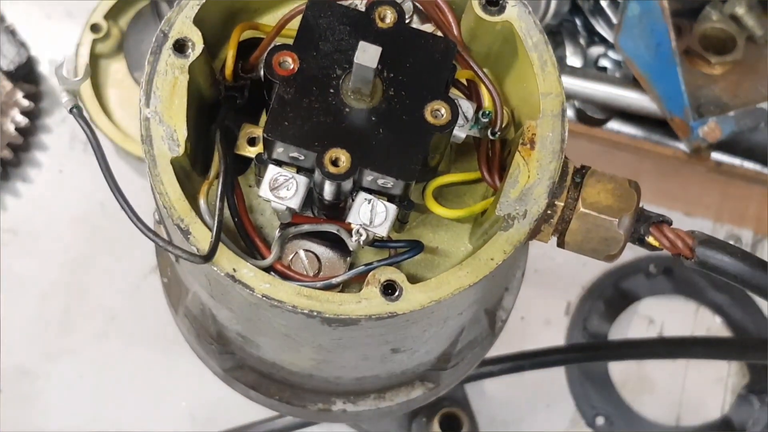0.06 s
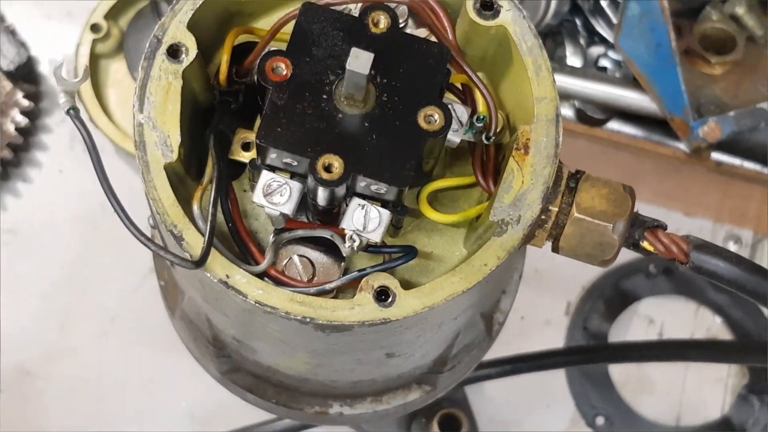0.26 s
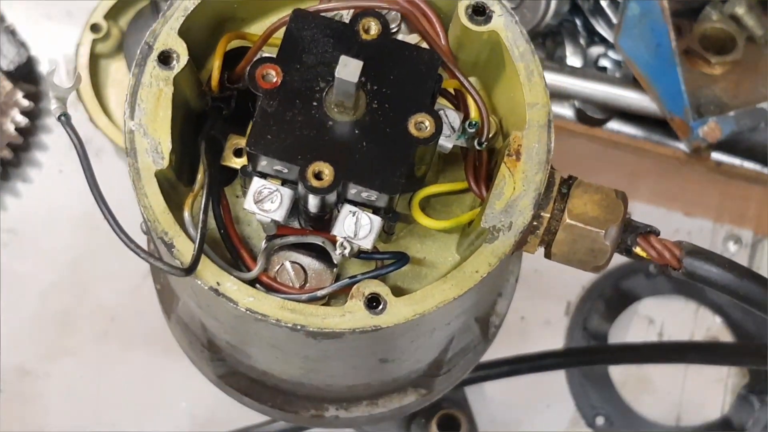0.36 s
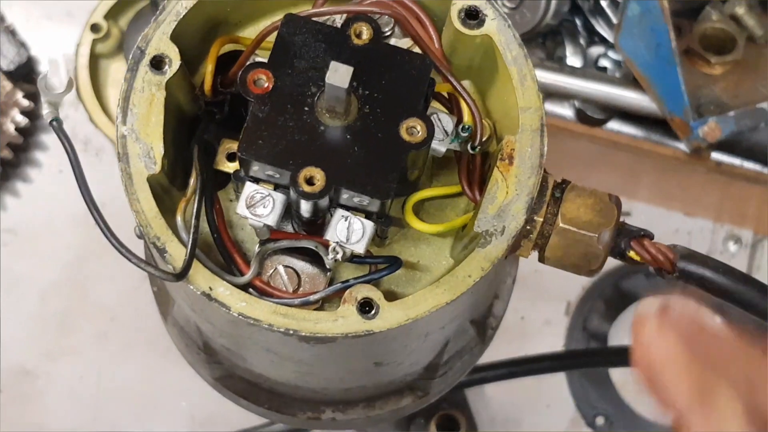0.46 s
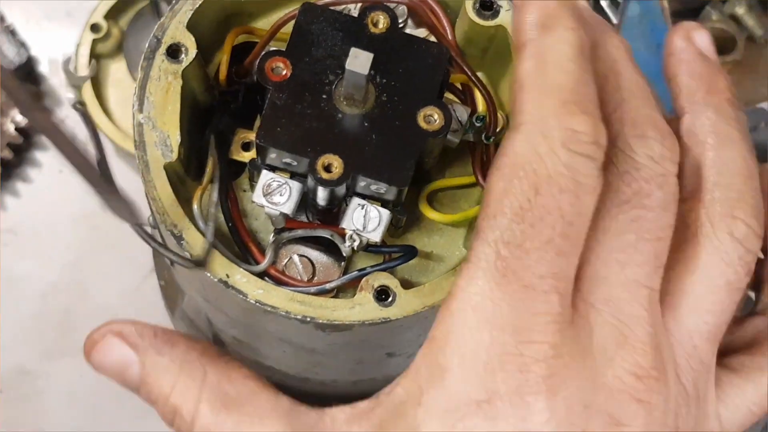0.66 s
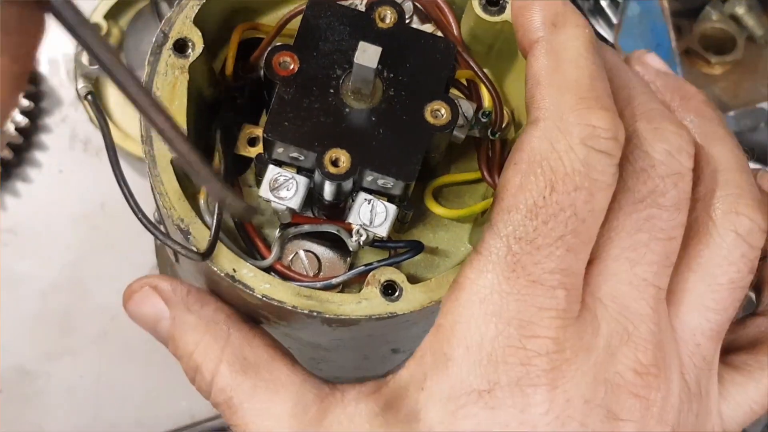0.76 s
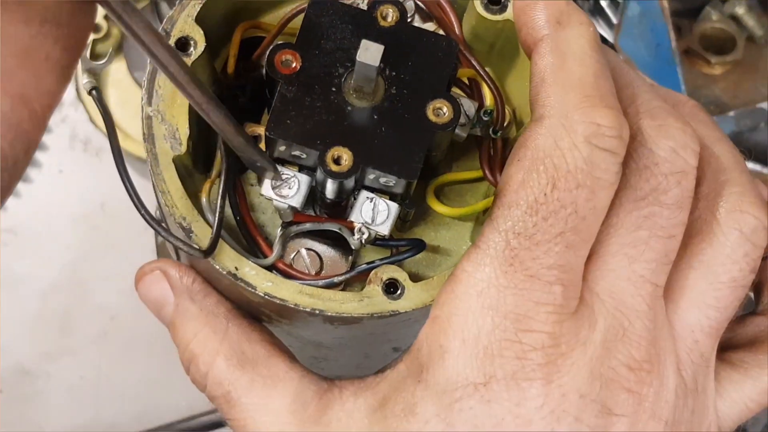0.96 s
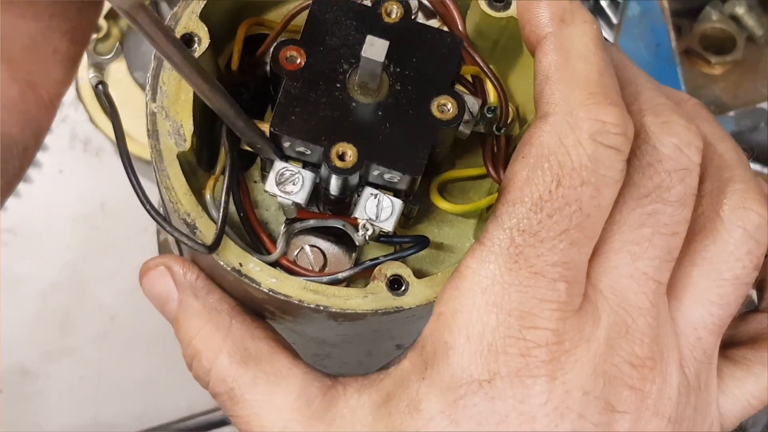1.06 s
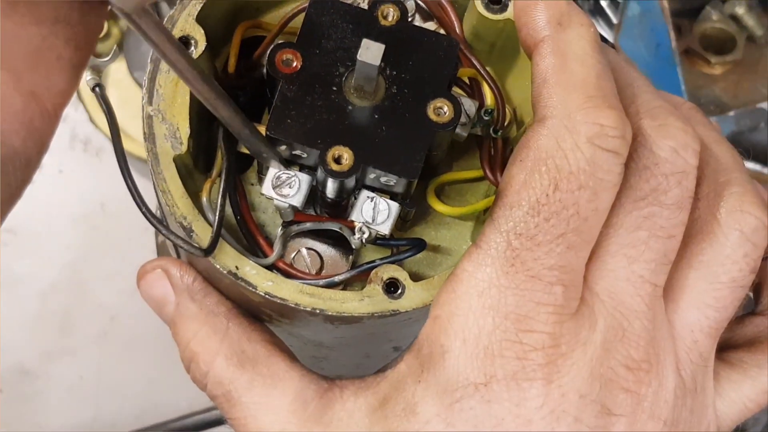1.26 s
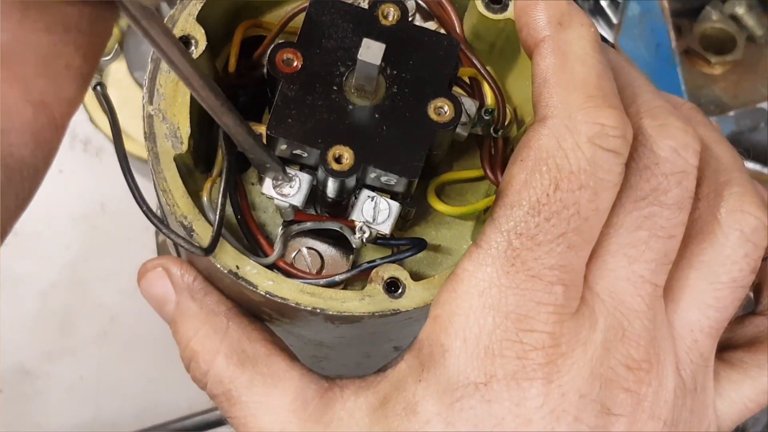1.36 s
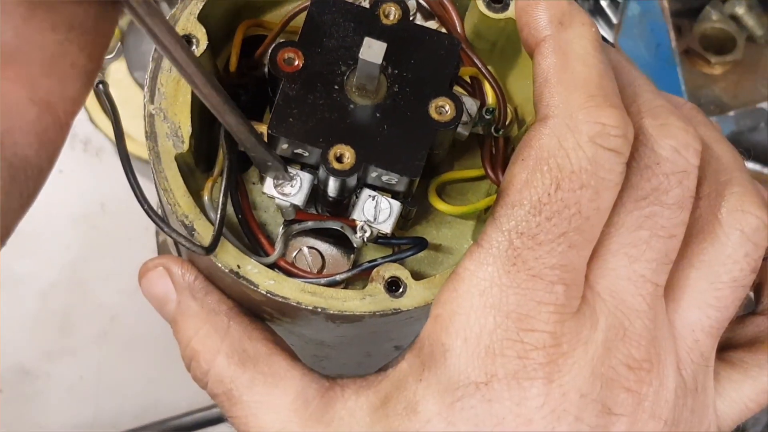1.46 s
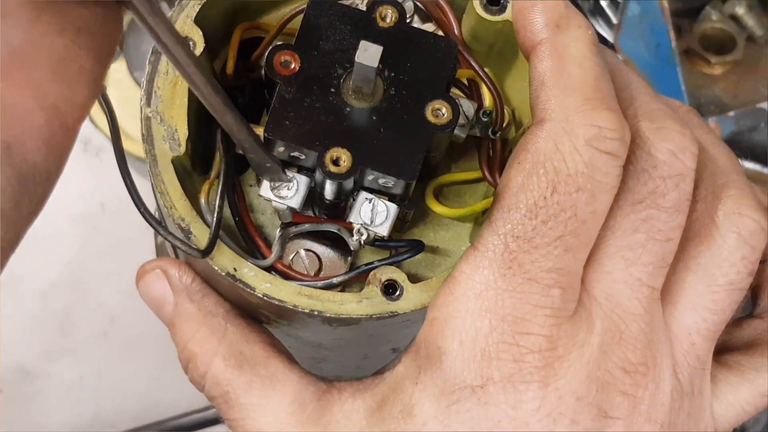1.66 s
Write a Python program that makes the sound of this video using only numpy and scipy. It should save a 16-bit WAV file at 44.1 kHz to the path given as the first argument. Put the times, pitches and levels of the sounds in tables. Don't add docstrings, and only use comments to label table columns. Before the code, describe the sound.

Screwdriver contact on metal terminal screws, recorded close in a quiet workshop. At about 0.15 s a tool lands with a hollow knock, thud and loose rattle, settling by 0.25 s. Soft sleeve rustle follows until 0.8 s, with a tiny tick near 0.75. A light tap at 1.03 precedes the hard, bright click at 1.11, then faint scrapes to 1.35 and a last tap at 1.45. Low rumble and hiss throughout.

```python
import sys
import numpy as np
from scipy import signal
from scipy.fft import rfft, irfft, next_fast_len
from scipy.io import wavfile
from scipy.ndimage import map_coordinates

SR = 44100
rng = np.random.default_rng(int(sys.argv[2]) if len(sys.argv) > 2 else 0)


def dump(signal):
    limited = np.clip(np.atleast_2d(signal).T, -1, 1)
    pcm = np.round(limited * 32767).astype(np.int16)
    wavfile.write(sys.argv[1], SR, pcm)


def nominal_scale(level):
    x = np.asarray(level, float) / 20
    return 10 ** x


N = 74970

# f/Hz, level/dB
CRACK_COLOUR = [(500, -53.5), (1200, -11.5), (2200, -3), (4000, 1.4), (7000, -13.5), (10000, -21),
                (16000, -31.5)]
# f/Hz, level/dB per Hz
BRIGHT_COLOUR = [(1000, -37.5), (5000, -1.5), (8000, -2), (11500, 3), (16000, -9)]
SCREW_T60 = .016
WANDER = .05


def unit(x):
    return x / np.sqrt(np.mean(x ** 2) + 1e-20)


def along(points, hz):
    f, v = np.transpose(points)
    return np.interp(np.log(hz + 1), np.log(f + 1), v)


def filtered(x, response):
    m = next_fast_len(x.shape[-1] + 4096)
    spectrum = rfft(x, m) * response(np.fft.rfftfreq(m, 1 / SR))
    return irfft(spectrum, m)[..., :x.shape[-1]]


def band(x, lo_hz, hi_hz):
    return signal.sosfilt(signal.butter(3, [lo_hz, hi_hz], "band", fs=SR, output="sos"), x)


def noise(points, size, alike=0.4, tilt_db=0):
    a, b = rng.standard_normal((2, size))
    u = np.arccos(np.clip(alike, -1, 1)) / 2
    pair = np.array([np.cos(u) * a + np.sin(u) * b, np.cos(u) * a - np.sin(u) * b])
    return unit(filtered(pair, lambda hz: nominal_scale(along(points, hz) + tilt_db * np.log2((hz + 50) / 3500))))


def wobble(rate):
    return map_coordinates(rng.standard_normal(int(N * rate / SR) + 4), [np.arange(N) * rate / SR])


def ring(modes, tilt_db, t60):
    t = np.arange(SR // 4) / SR
    hz, db = np.transpose(modes)[:, :, None]
    spread_db = 2 * rng.standard_normal((2, len(hz), 1))
    level = nominal_scale(db + tilt_db * np.log2(hz / 3500) + spread_db - 60 * t / t60)
    drift = WANDER * np.cumsum(rng.standard_normal((len(hz), len(t))), axis=1)
    start = .5 * rng.standard_normal((2, len(hz), 1))
    return np.sum(level * np.sin(2 * np.pi * hz * t + drift + start), axis=1)


def add(track, s, x, pan_db):
    i = round(s * SR)
    track[:, i:i + x.shape[1]] += (x * nominal_scale([[pan_db / 2], [-pan_db / 2]]))[:, :N - i]


def crack_and_chatter(t):
    return nominal_scale(-0.5 - 60 * t / 0.0057) + nominal_scale(-6 - 60 * t / 0.0426)


def screw_taps():
    # t/s, peak level/dB, brightness/dB per octave, ring share 0-1, housing note/dB over peak
    taps = [(0.3571, -55.5, -22.5, .5, -42.5), (0.8842, -49.5, 1, .3, -38), (1.028, -24.5, 1, 0.2, -19.5),
            (1.0755, -34, -13, 0.4, -12.5), (1.1128, -8, -3.9, 0.55, -56), (1.118, -14, -4, 0.8, -31),
            (1.1285, -31, 11.5, 0.3, -12), (1.145, -35.5, 15, 0, -5.5), (1.17, -56, 14, 0.2, -4),
            (1.292, -42, -7.5, .3, -28), (1.337, -51, 7.5, 0.4, -33.5), (1.4538, -29, -0.5, 0.32, -17.5)]
    # f/Hz, level/dB
    screw_modes = [(1500, -21.5), (1720, -9.5), (2132, -13), (2550, -9.5), (2760, -7), (3400, -0.5),
                   (3690, 7), (4300, -16), (5303, -7.5)]
    noisy, rings, t = np.zeros((2, N)), np.zeros((2, N)), np.arange(SR // 4) / SR
    swell = nominal_scale(-60 * t / .05) * (1 - np.exp(-t / 0.0048))
    hollow = swell * np.sin(2 * np.pi * 896 * t) * np.ones((2, 1))
    burst = crack_and_chatter(t)
    for s, db, tilt_db, share, hollow_db in taps:
        level = nominal_scale(db - 14.0)
        crack = burst * noise(CRACK_COLOUR, len(t), alike=.8, tilt_db=tilt_db)
        screw = ring(screw_modes, tilt_db, SCREW_T60)
        add(noisy, s, level * band((1.1 - share) * crack, 1400, 7000), pan_db=11.5)
        add(rings, s, level * band(share * screw, 1500, 6300), pan_db=17)
        add(rings, s, nominal_scale(db + hollow_db) * hollow, pan_db=8.5)
    return noisy, rings


def slot_scrapes():
    # t/s, half length/s, singing mode f/Hz, its share 0-1
    slides = [(1.086, .004, 2100, .5), (1.088, .003, 3650, .7), (1.1, .004, 1900, .7),
              (1.228, .008, 1850, .85), (1.308, .014, 1550, .4), (1.32, .008, 4300, .4),
              (1.328, .006, 2540, .8), (1.334, .003, 3700, .6), (1.333, .004, 4100, .5),
              (1.333, .006, 6300, .5), (1.355, .01, 5500, .1)]
    slide_db = [-44, -48, -56, -72.5, -70, -63.5, -58.5, -51, -57.5, -69, -72.5]
    slips_per_s, scatter_db = 5800, 3.5
    middle_s = .04
    noisy, rings, t = np.zeros((2, N)), np.zeros((2, N)), np.arange(SR // 4) / SR
    for (s, half, hz, share), db in zip(slides, slide_db):
        slips = (rng.random(len(t)) < slips_per_s / SR) * rng.choice([-1, 1], len(t))
        slips = slips * nominal_scale(scatter_db * rng.standard_normal(len(t)))
        slips = nominal_scale(db) * unit(slips)[None] * np.exp(-.5 * ((t - middle_s) / half) ** 2)
        sing = nominal_scale(-60 * t / .013) * np.sin(2 * np.pi * hz * t) * np.ones((2, 1))
        grit = nominal_scale(-60 * t / .003) * noise(CRACK_COLOUR, len(t))
        for track, part, body in (rings, share, sing), (noisy, 1 - share, grit):
            x = band(signal.fftconvolve(slips, body, axes=1), 1100, 8000)
            x = x * np.linalg.norm(slips) / np.linalg.norm(x[0])
            add(track, s - middle_s, part * x, pan_db=13)
    return noisy, rings


def plate_touches():
    # t/s, level/dB, brightness/dB per octave
    nudges = [
        (1.028, -39.5, 3),
        (1.4535, -48.5, -2),
    ]
    # f/Hz, level/dB
    plate_modes = [(1270, -11), (1530, -5), (1800, -3.5), (2130, -2), (2520, -3.5), (3220, -5),
                   (3600, -1.5), (4160, 0), (4500, -4.5), (4760, -7.5), (5230, -6.5), (5950, -8),
                   (7000, -17)]
    # t/s, level/dB
    ticks = [
        (1.028, -50),
        (1.4538, -56),
    ]
    # f/Hz, level/dB
    blade_modes = [(1800, -0.5), (3550, -0.7), (5200, -3), (6500, -1), (7800, -24), (11500, -9)]
    out, t = np.zeros((2, N)), np.arange(SR // 4) / SR
    for s, db, tilt_db in nudges:
        add(out, s, nominal_scale(db) * band(ring(plate_modes, tilt_db, SCREW_T60), 1100, 8900), pan_db=11)
    for s, db in ticks:
        add(out, s, nominal_scale(db - 60 * t / .006) * noise(BRIGHT_COLOUR, len(t)), pan_db=8.5)
    blade = ring(blade_modes, 0, SCREW_T60) + 0.56 * crack_and_chatter(t) * noise(BRIGHT_COLOUR, len(t))
    add(out, .7495, nominal_scale(-51.5) * band(blade, 1600, 13000), pan_db=17.5)
    return out


def tool_landing():
    # t/s, peak level/dB, rattle length/s, rattle over ring/dB
    knocks = [
        (0.1036, -39.5, 0.002, -3),
        (0.107, -31.5, 0.013, -2),
        (0.1436, -20, 0.0012, -7.5),
        (0.1449, -10.5, 0.0011, -14.5),
        (0.153, -20.5, 0.0019, -11.5),
        (0.16, -23, 0.0063, -6),
        (0.167, -21.5, 0.011, -8),
        (0.2063, -29.5, 0.002, -8.5),
        (0.216, -36, 0.0025, -8),
        (.223, -33.5, 0.0049, -9.5),
    ]
    # f/Hz, level/dB
    tool_modes = [(1195, -18), (1400, -15), (1744, -13), (2300, -18), (2826, -17), (3500, -15), (3920, -13),
                  (4800, -10.5), (5100, -15.5), (6630, -25.5)]
    # f/Hz, level/dB per Hz
    rattle_colour = [(400, -40), (620, -26.5), (950, -12.5), (1400, -14), (2100, -15), (4500, -6),
                     (6400, -20.5), (16000, -25)]
    out, t = np.zeros((2, N)), np.arange(SR // 4) / SR
    for s, db, hold, rattle_db in knocks:
        shake = np.minimum(1, nominal_scale(-60 * (t - hold) / 0.063)) * nominal_scale(1.4 * wobble(300)[:len(t)])
        dull_db = 0.58 * (db + 16.0)
        rattle = shake * noise(rattle_colour, len(t), alike=0.42, tilt_db=dull_db)
        x = ring(tool_modes, 0, .022) + nominal_scale(rattle_db) * rattle
        add(out, s, nominal_scale(db) * band(band(x, 680, 18000), 680, 18000), pan_db=6.0)
    return out


def handle_tocks():
    # t/s, peak level/dB, f/Hz, t60/s
    tocks = [(0.1034, -27.5, 1040, 0.033), (.1438, -14.5, 1022, .045), (.1438, -15.5, 875.6, .05),
             (.1438, -27, 732, .05), (.1513, -26.5, 900, .04), (0.152, -24, 1215, .04),
             (.162, -29, 1010, .03), (.172, -24, 1100, .02), (.2071, -28, 991, .022),
             (.214, -34.5, 900, .022), (.222, -33.5, 900, .035)]
    out, t = np.zeros((2, N)), np.arange(SR // 4) / SR
    for s, db, hz, t60 in tocks:
        drift = .25 * WANDER * np.cumsum(rng.standard_normal(len(t)))
        level = nominal_scale(db - 60 * t / t60) * (1 - np.exp(-t / .001))
        add(out, s, -level * np.sin(2 * np.pi * hz * t + drift) * np.ones((2, 1)), pan_db=4.0)
    return out


def bench():
    # t/s, peak level/dB, f/Hz, rise/s, t60/s
    thumps = [(.001, -51.5, 150, 0.0031, .08), (0.055, -27.5, 129.3, 0.019, 0.059),
              (0.109, -32, 209, 0.0016, 0.15), (0.1428, -24, 137, 0.0023, 0.11),
              (0.147, -27, 241.7, 0.0034, .1), (.175, -42.5, 50, 0.013, 0.17),
              (.208, -35.5, 182.5, 0.0043, 0.086), (.215, -45.5, 265, 0.0047, .1),
              (0.231, -42.5, 109, 0.004, 0.11), (0.496, -57, 447, 0.016, 0.13),
              (.585, -53, 150, 0.0061, .12), (0.706, -48, 60, 0.0077, .15), (.755, -52.5, 72.8, .005, 0.14),
              (1.029, -40.5, 148.5, 0.0026, 0.084), (1.045, -48, 55.5, .01, .12),
              (1.075, -44, 110, .004, .1), (1.115, -42, 138, 0.0044, 0.079),
              (1.145, -40.5, 154.2, 0.0011, 0.13), (1.166, -41, 85, 0.0042, 0.11),
              (1.316, -58, 71.1, 0.016, .15), (1.455, -36, 147.9, 0.0019, .07),
              (1.478, -47.5, 109.5, .003, .05), (1.505, -48, 84.4, 0.0051, 0.099)]
    out, t = np.zeros((2, N)), np.arange(SR // 3) / SR
    for s, db, hz, rise, t60 in thumps:
        level = nominal_scale(db - 60 * t / t60) * (1 - np.exp(-t / rise)) ** 2
        x = level * np.sin(2 * np.pi * hz * t * (1 - 0.64 * t))
        make_up = nominal_scale(60 * rise / t60 + 2)
        add(out, s, x * make_up * np.ones((2, 1)), pan_db=2.5)
    return out


def rocking():
    # t/s, level/dB, t60/s
    rocks = [
        (.106, -40, 0.2),
        (.146, -34, 0.16),
        (1.03, -58.5, 0.13),
        (1.078, -56.5, .1),
        (1.115, -49, 0.1),
        (1.146, -51.5, 0.17),
        (1.17, -53, 0.11),
        (1.457, -58.5, 0.12),
    ]
    # f/Hz, level/dB per Hz
    rock_colour = [(120, -35.5), (220, 3.5), (450, -6.5), (900, -8), (1500, -14), (3000, -41)]
    out, t = np.zeros((2, N)), np.arange(SR // 4) / SR
    for s, db, t60 in rocks:
        level = nominal_scale(db - 60 * t / t60) * (1 - np.exp(-t / 0.0053))
        add(out, s, level * noise(rock_colour, len(t), alike=.9), pan_db=6.0)
    return out


def sleeve():
    # t/s, level/dB
    brushing = [(0, -71), (.1, -60), (.3, -69.5), (.38, -67), (.45, -62), (.62, -60.5), (.72, -68),
                (.8, -71.5), (.9, -84.5)]
    # t/s, half length/s, level/dB
    swishes = [
        (.5, 0.021, -62),
        (0.572, 0.041, -64),
        (.66, 0.0191, -64),
    ]
    # f/Hz, level/dB per Hz
    cloth_colour = [(300, -37), (440, -6), (520, -16.5), (1900, -16.5), (3300, -19), (4700, -10.5),
                    (6000, -19), (16000, -25)]
    t = np.arange(N) / SR
    folds = sum(nominal_scale(db) * np.exp(-.5 * ((t - s) / w) ** 2) for s, w, db in swishes)
    rub_db = np.interp(t, *np.transpose(brushing), right=-120) + 1.1 * wobble(27)
    rub = nominal_scale(rub_db) * noise(cloth_colour, N, alike=.3)
    swish = folds * noise(BRIGHT_COLOUR, N, alike=0.35)
    grain = nominal_scale(2.2 * wobble(1300))
    return grain * (rub + swish) * nominal_scale([[1.5], [-1.5]])


def room(x, gap_s=.004):
    # f/Hz, t60/s
    decay = [(300, 0.2), (4000, 0.15), (12000, 0.21)]
    hz, t, z = signal.stft(rng.standard_normal((2, SR // 3)), SR, nperseg=256)
    tail = signal.istft(z * nominal_scale(-60 * t / along(decay, hz)[:, None]), SR, nperseg=256)[1]
    tail = np.pad(tail / np.linalg.norm(tail[0]), ((0, 0), (round(gap_s * SR), 0)))
    return signal.fftconvolve(x.mean(axis=0)[None], tail, axes=1)[:, :N]


def floor():
    # f/Hz, level/dB
    hiss_colour = [(150, -29), (250, -1.5), (1180, -12), (1470, -10.5), (2320, -11), (4570, -14.5),
                   (16000, -13)]
    # f/Hz, level/dB per Hz
    rumble_colour = [(12, -50.5), (20, -4), (65, 0.5), (96, 3), (184, -11), (330, -22), (430, -45),
                     (730, -120)]
    hiss = nominal_scale(-69) * noise(hiss_colour, N, alike=.3)
    rumble_db = -63.5 + 1.9 * wobble(17) + 2.5 * wobble(25)
    return hiss + nominal_scale(rumble_db) * noise(rumble_colour, N, alike=0.93)


def scene():
    tap_noise, tap_rings = screw_taps()
    scrape_noise, scrape_rings = slot_scrapes()
    noisy = tap_noise + scrape_noise + plate_touches()
    rings = tap_rings + scrape_rings
    tool = tool_landing() + handle_tocks()
    tool_room = nominal_scale(-19) * room(tool) * nominal_scale([[1.5], [-1.5]])
    screw_room = nominal_scale(-7.5) * room(noisy + nominal_scale(-18) * rings) * nominal_scale([[4], [-4]])
    close = noisy + rings + tool
    return close + tool_room + screw_room + bench() + rocking() + sleeve() + floor()


def top_cut(x):
    return signal.sosfilt(signal.butter(12, 16810, fs=SR, output="sos"), x)


def record(dry):
    mix = filtered(dry, lambda hz: np.where(hz < 15950, 1, nominal_scale(-34)))
    return top_cut(mix)


dry = scene()
out = record(dry)
dump(out)
```